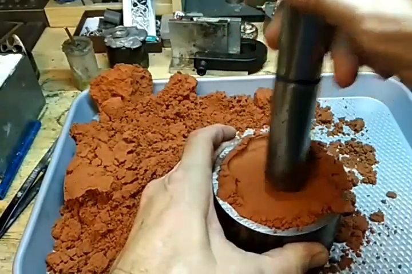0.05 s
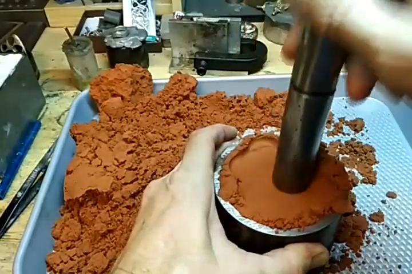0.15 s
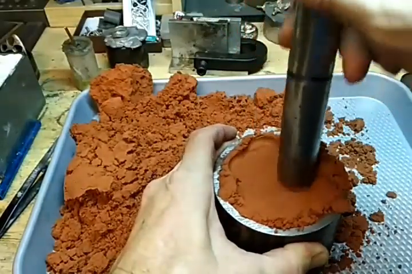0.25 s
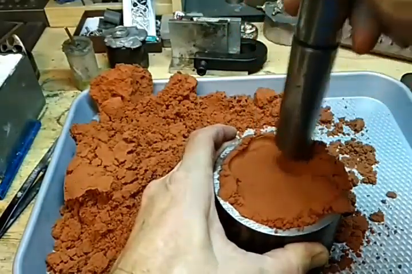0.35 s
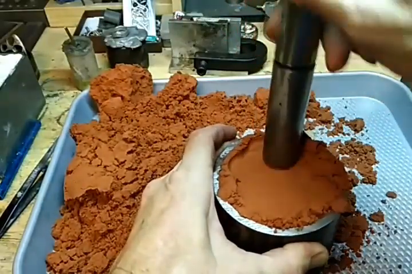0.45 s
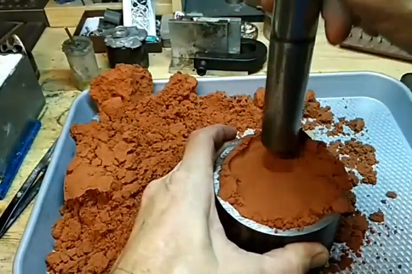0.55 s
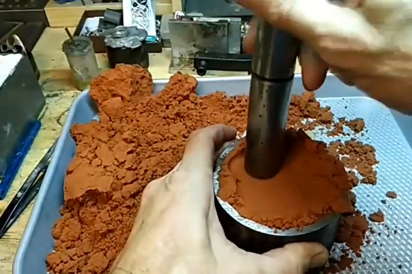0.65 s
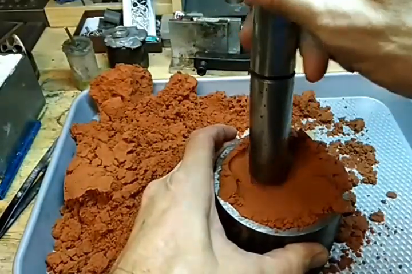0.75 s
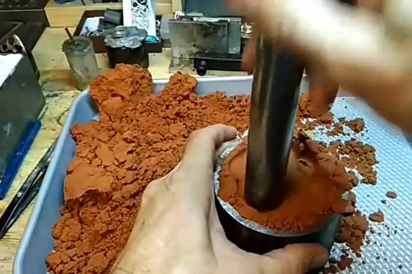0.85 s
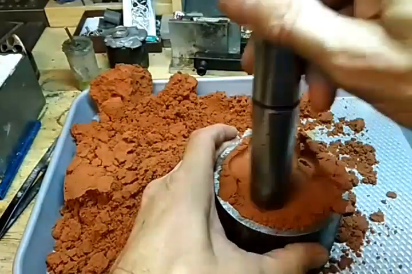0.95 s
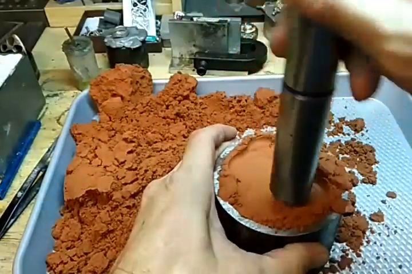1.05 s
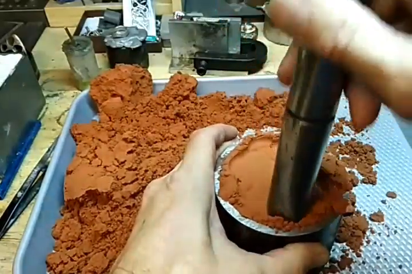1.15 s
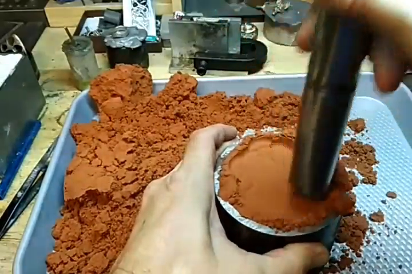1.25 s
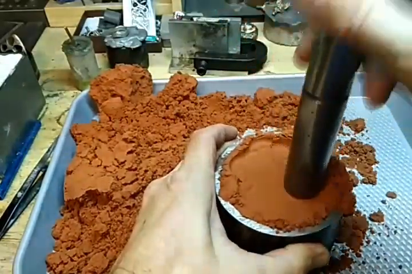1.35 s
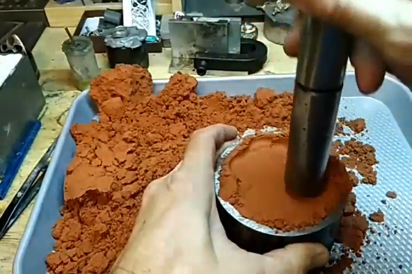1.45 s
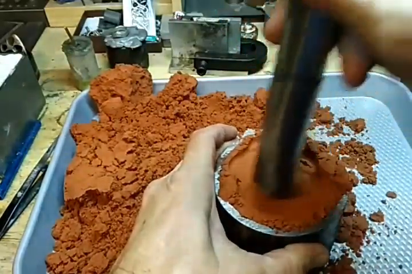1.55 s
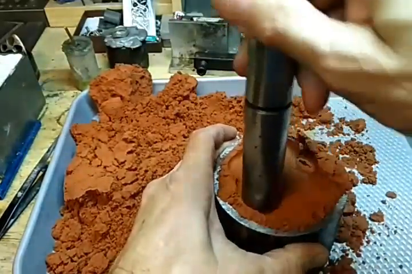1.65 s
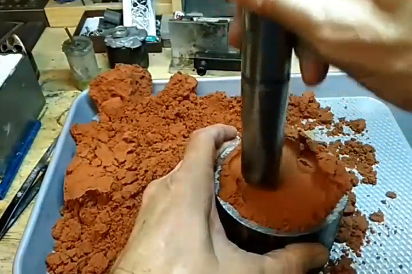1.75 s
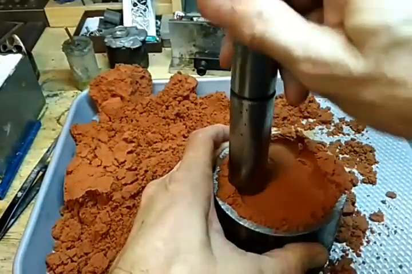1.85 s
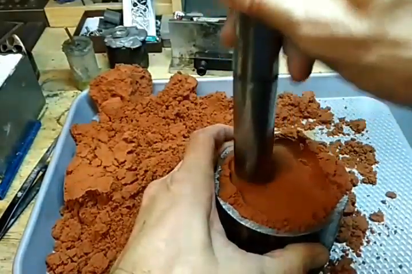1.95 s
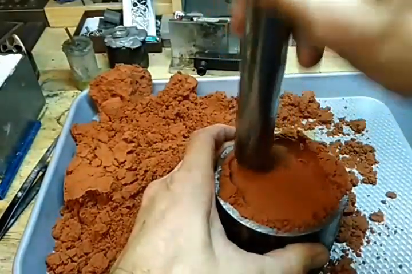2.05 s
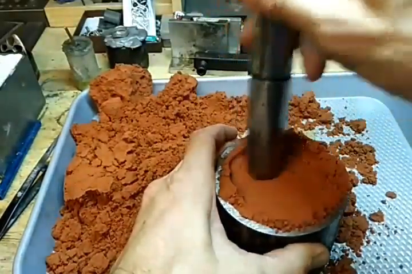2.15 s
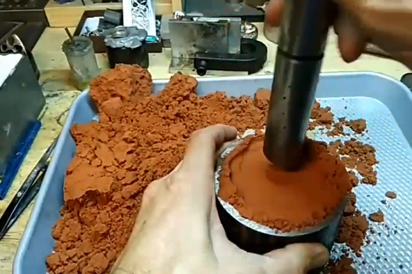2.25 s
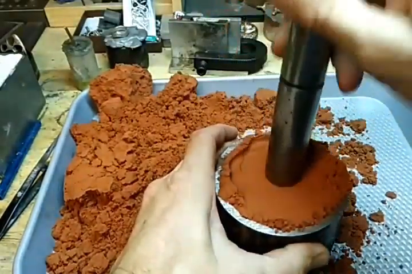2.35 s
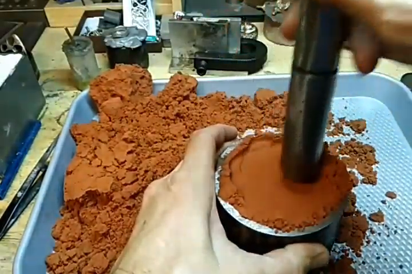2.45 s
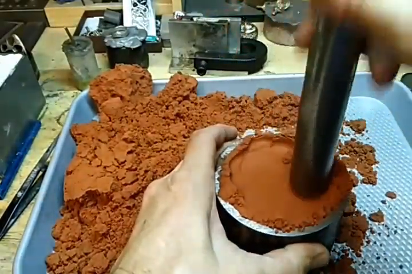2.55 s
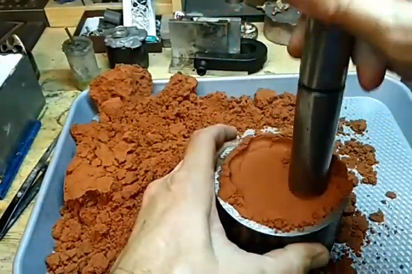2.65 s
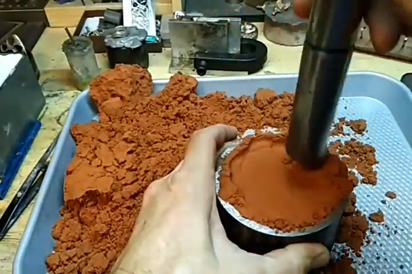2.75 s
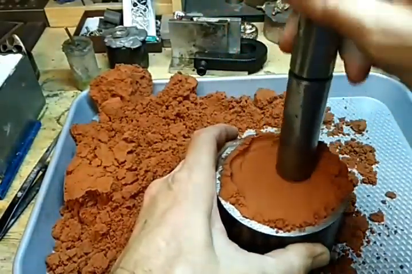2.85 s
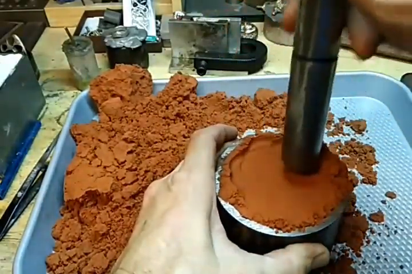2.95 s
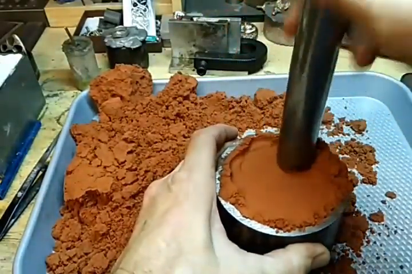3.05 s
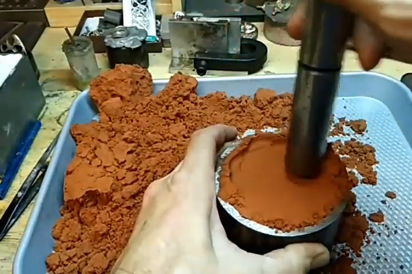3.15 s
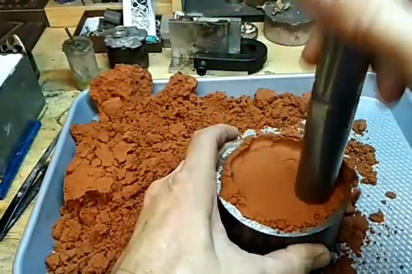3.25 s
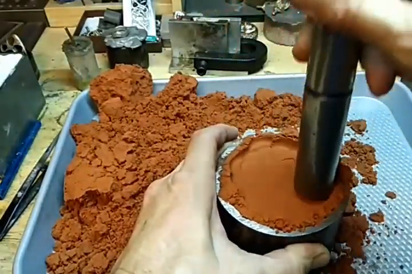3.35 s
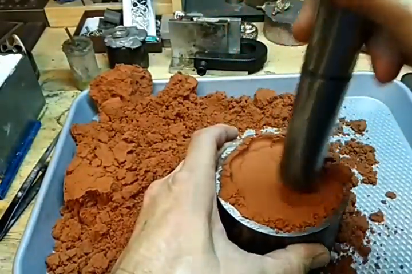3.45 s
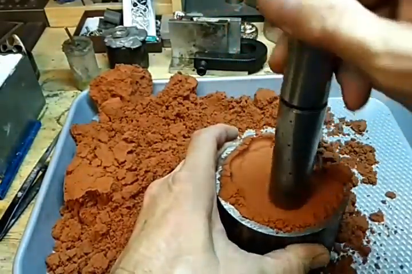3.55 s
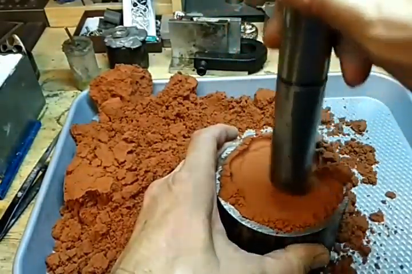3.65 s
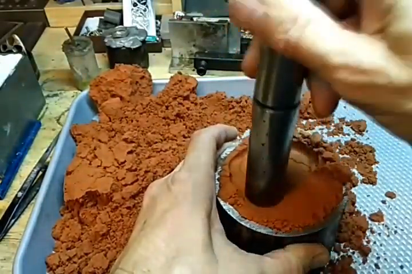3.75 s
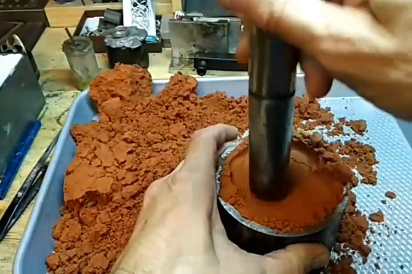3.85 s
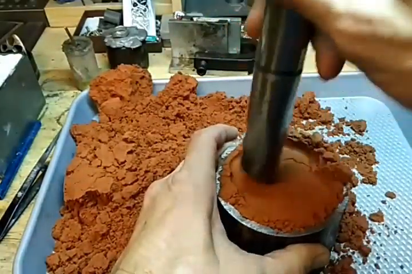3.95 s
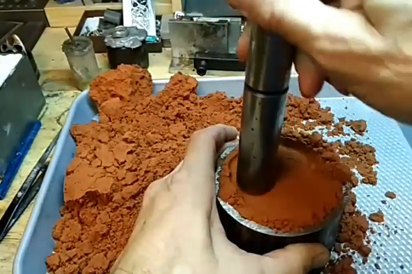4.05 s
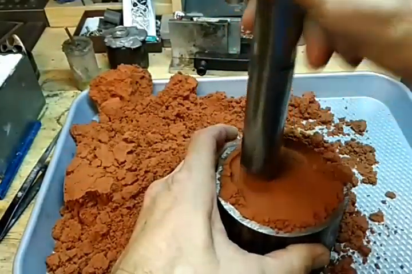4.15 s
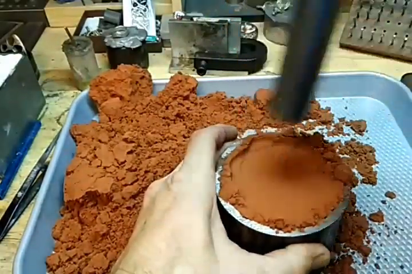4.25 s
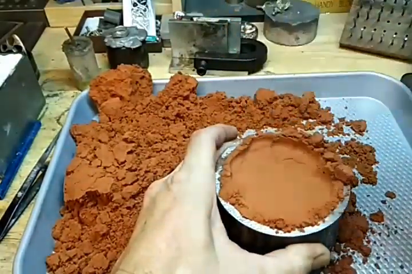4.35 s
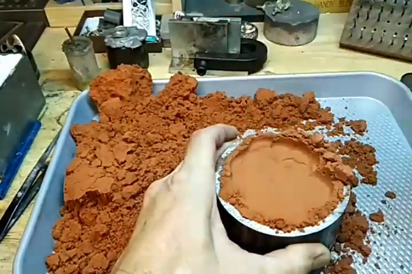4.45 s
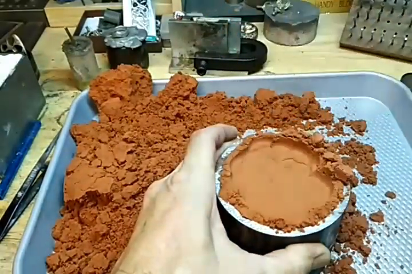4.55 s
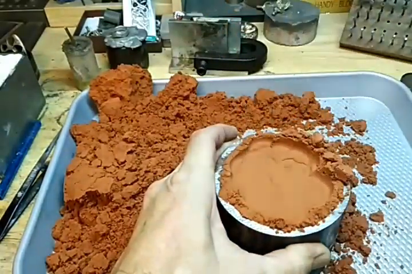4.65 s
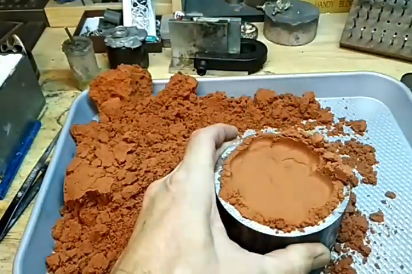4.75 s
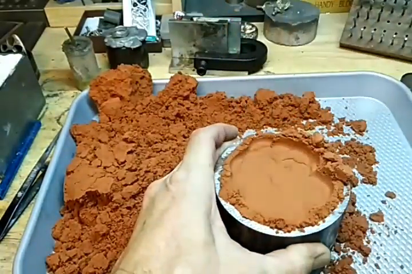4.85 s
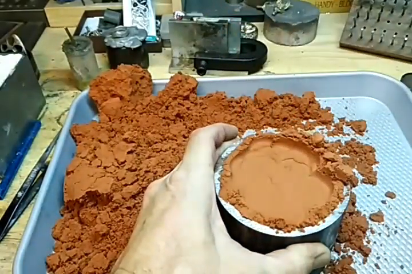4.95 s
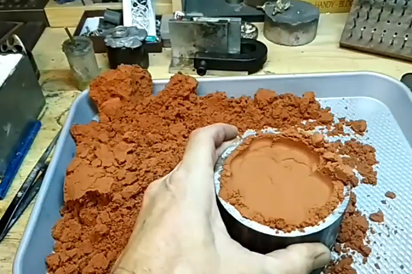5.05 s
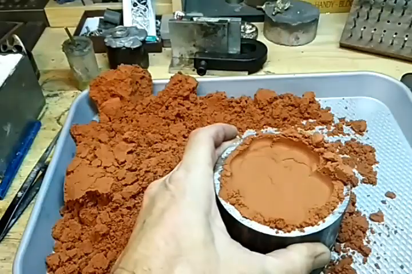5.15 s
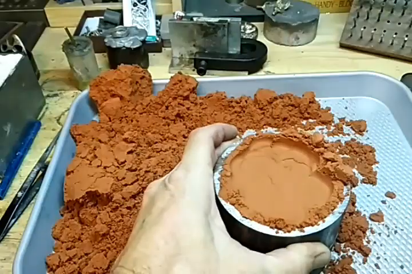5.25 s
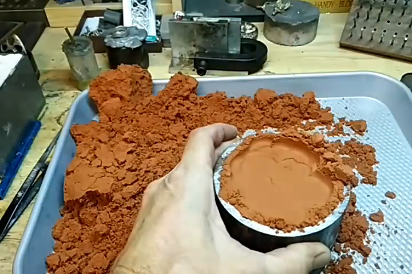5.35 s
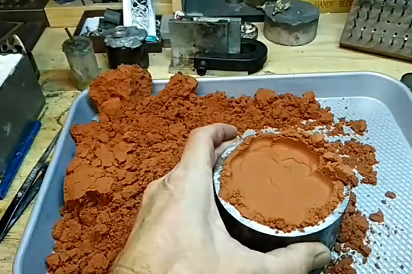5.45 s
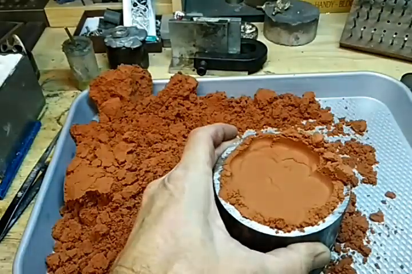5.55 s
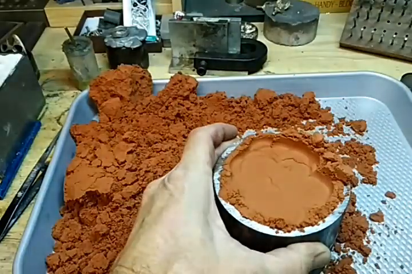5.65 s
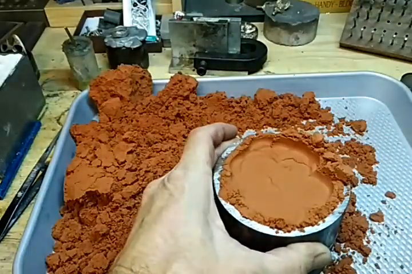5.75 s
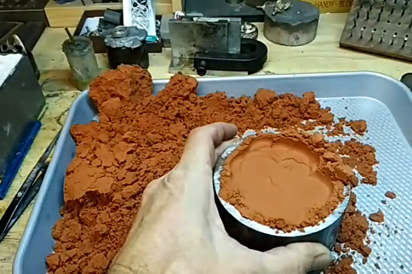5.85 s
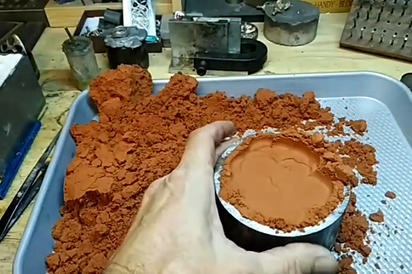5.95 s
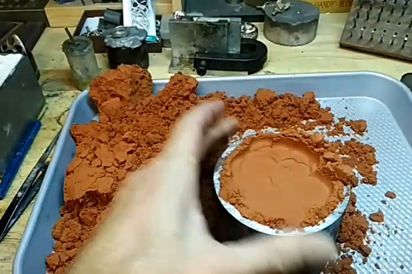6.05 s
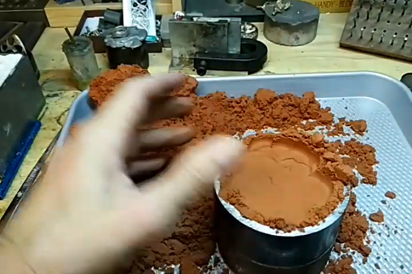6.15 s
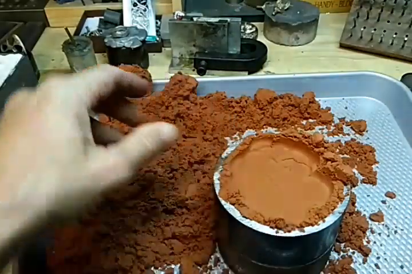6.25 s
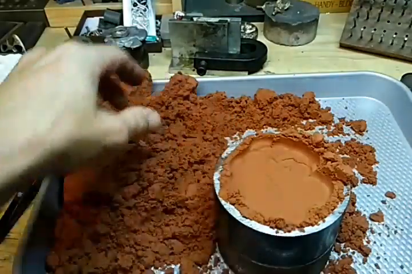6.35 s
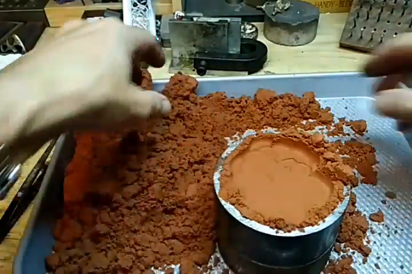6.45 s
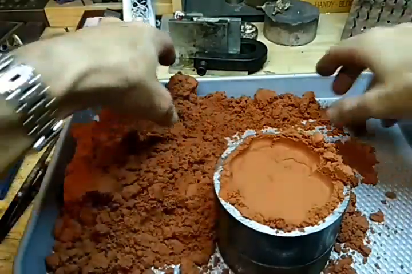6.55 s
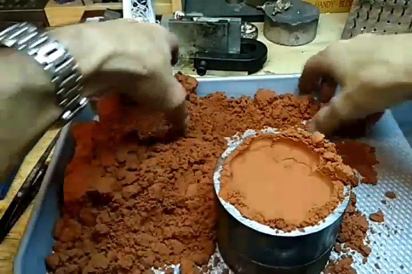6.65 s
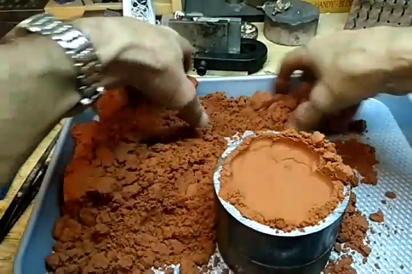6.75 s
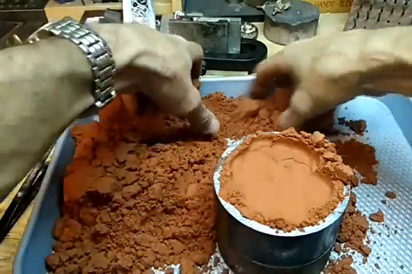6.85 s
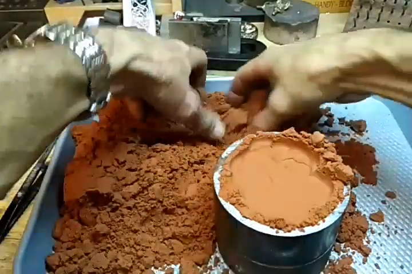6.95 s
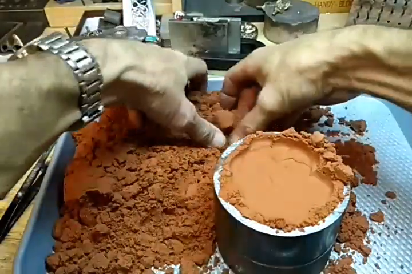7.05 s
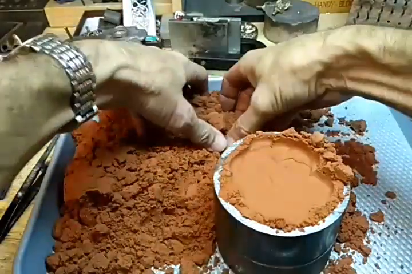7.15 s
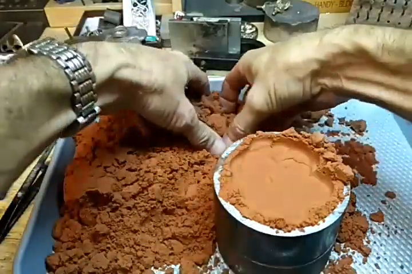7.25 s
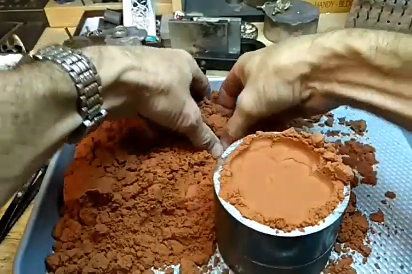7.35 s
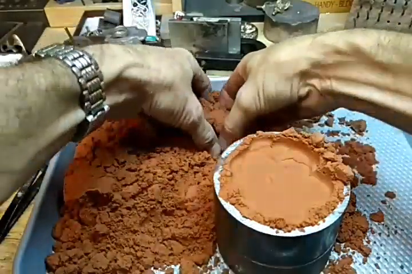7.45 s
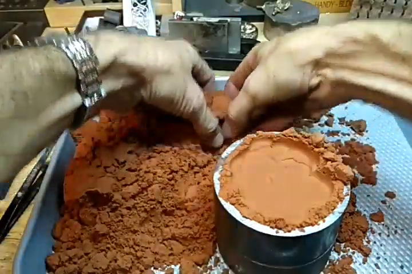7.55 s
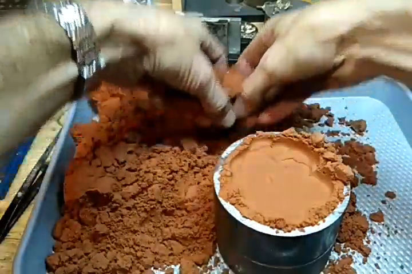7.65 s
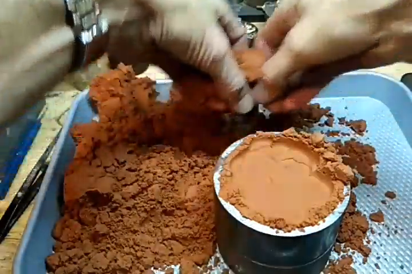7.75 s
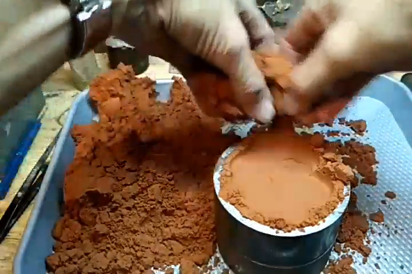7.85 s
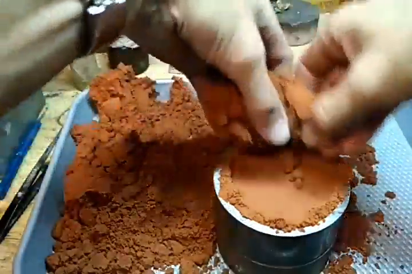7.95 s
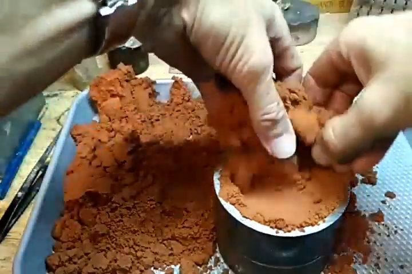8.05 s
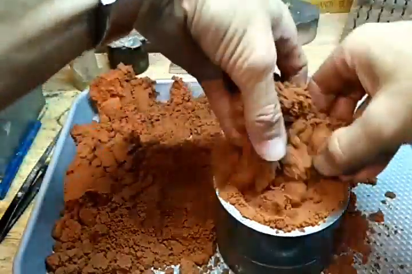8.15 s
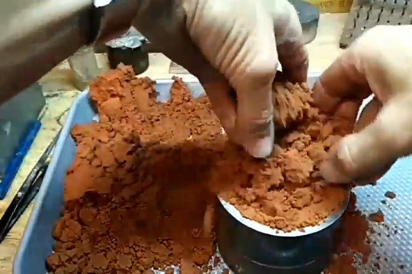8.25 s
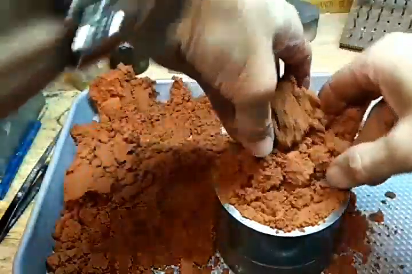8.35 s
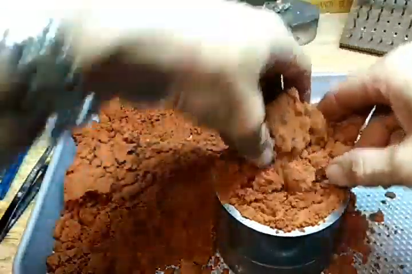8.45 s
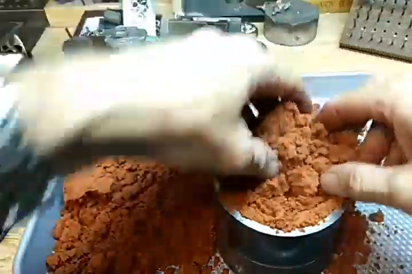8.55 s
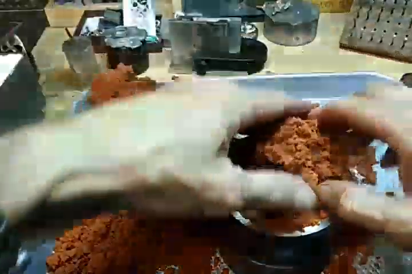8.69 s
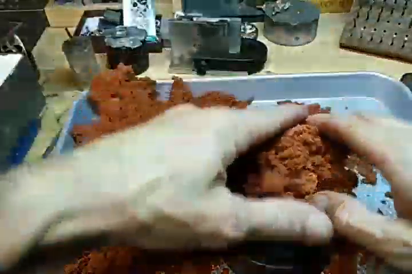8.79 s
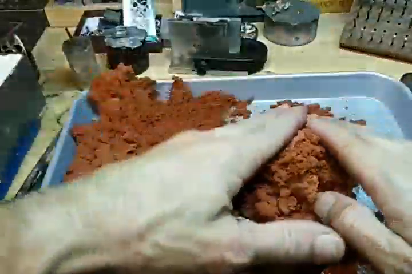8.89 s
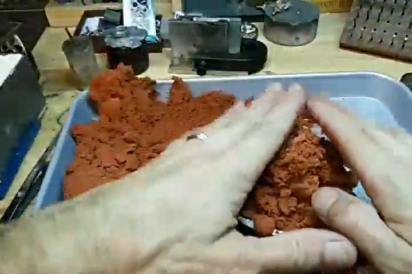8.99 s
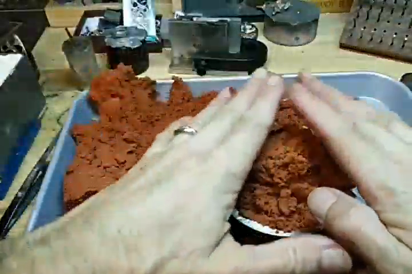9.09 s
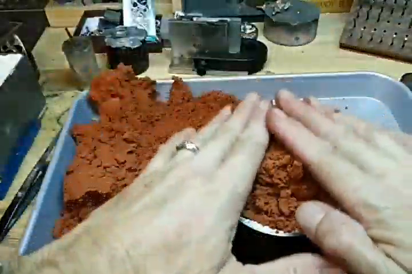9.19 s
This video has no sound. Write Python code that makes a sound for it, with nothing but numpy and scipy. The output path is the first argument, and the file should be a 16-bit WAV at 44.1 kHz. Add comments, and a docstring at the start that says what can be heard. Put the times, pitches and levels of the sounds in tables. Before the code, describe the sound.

Fast, gritty thuds of sand being pounded in a metal mould, then a few knocks on a wooden bench and quiet scooping.

```python
"""Crunching thumps, about four a second, as a steel rod rams damp sand into a metal flask.
Each blow makes the grains slip, excites the modes of the flask, its plastic tray and the workbench,
and leaves the rod ringing faintly in a small workshop. The rod is laid down with a few knocks,
then fingers rustle through loose sand in the tray. A soft mains hum lies underneath."""
import sys
import numpy as np
from scipy import signal
from scipy.fft import rfft, irfft
from scipy.io import wavfile
from scipy.ndimage import uniform_filter1d

SR = 44100
rng = np.random.default_rng(int(sys.argv[2]) if len(sys.argv) > 2 else 0)


def wav_out(sig):
    """Save sig, one row per channel (or a flat mono array), as 16-bit PCM at SR to the path in sys.argv[1]."""
    wavfile.write(sys.argv[1], SR, np.round(np.clip(np.atleast_2d(sig).T, -1, 1) * 32767).astype(np.int16))


N = 406602
AGE = np.arange(int(.6 * SR)) / SR  # seconds since an event began
BLOW_S = .065
BOOM_GROWTH = .55  # dB of bench boom per dB of excitation

# rod blows: start_s, force_db (against a usual blow), squeeze_db (against the bite), ring_db
BLOWS = [(0.0107, -0.6, -11, -49.5), (0.2555, -4, -16, -51.5), (0.506, -17.5, -23.5, -76),
         (0.7416, 6, -19, -38), (0.96, -5, -14.5, -54), (1.213, -7.7, -14.5, -65),
         (1.4531, -1, -9.5, -48.5), (1.694, 3, -13.5, -49), (1.9308, -6, -13, -60), (2.1715, 5.5, -16, -40),
         (2.4182, 1, -12, -42.5), (2.666, -0.5, -6.5, -55), (2.9229, -2.5, -13, -50),
         (3.161, -9.5, -20, -79), (3.387, -17.5, -21.5, -84), (3.6272, -1.5, -8, -62),
         (3.8705, -0.1, -9, -48), (4.1229, 2, -17.5, -46)]
# modes of the workbench and of the plastic tray: pitch_hz, level_db, t60_s
BENCH_MODES = [(54, -12, .25), (82, -16, .11), (105, 0, .14)]
TRAY_MODES = [(152, -27.5, 0.034), (164.6, -17.5, 0.17), (217.6, -0.5, 0.06), (287.4, -8.5, 0.089),
              (404, -25, 0.11), (445.1, -19.5, .14), (580, -18.5, 0.082), (655, -25, 0.12),
              (830, -20, 0.12), (949, -20.5, 0.098), (1197, -17.5, 0.047)]
# spectra of a knock on the tray and of a sharp tick: frequency_hz, gain_db
KNOCK_SPECTRUM = [(200, -28.5), (350, 0.5), (440, 0), (600, -5.5), (730, -6), (840, -3), (980, -1.5),
                  (1100, -3.5), (1230, -2), (1450, -10.5), (1900, -14), (3000, -24), (8000, -79.5)]
TICK_SPECTRUM = [(500, -19), (1500, 6), (2500, 1), (4500, -1.5), (8000, -4.5), (11000, -13), (15500, -26.5)]


def ramming():
    """Granular friction and impact: the rod bites and squeezes sand, driving flask, tray and bench."""
    # spectrum of slipping sand: frequency_hz, gain_db
    crunch_spectrum = [(400, -23), (1200, -2.5), (2000, -4), (3200, 0.5), (4500, -2), (6300, -4),
                       (8200, -1), (10000, -7.5), (12000, -13.5), (15500, -16.5)]
    # modes of the flask wall: pitch_hz, level_db, t60_s
    flask_modes = [(1792, -2, .09), (2037, -3, .09), (2637, -2, .14), (3280, 0, .12), (4165, -1, .12),
                   (5049, -1, .15), (5276, -1, .12), (6298, -7, .14), (7490, -2, .16), (7994, -3, .15),
                   (9106, -2, .12)]
    bounce_hz = 226.8  # the rod and heavy flask bouncing on the springy sand bed
    sand, body = np.zeros((2, 2, N))
    for s, force_db, squeeze_db, _ in BLOWS:
        # hard blows bounce the flask; soft ones are mostly crunch and boom
        crunch_db, boom_db = -32.8 + .83 * force_db, -34.5 + BOOM_GROWTH * force_db
        knock_db, thump_db = -29 + 1.05 * force_db, -31 + .92 * force_db
        bounce_db = -29.5 + 1.5 * force_db
        # a faint, brief hiss leads into each blow
        lead_in = swell(peak_s=.004, sharpness=2.2)
        add(sand, s - .004, sized(grains(lead_in, crunch_spectrum, spread_db=.5), crunch_db - 21))
        bite = burst(rise_s=.0016, fall_s=.0036)
        squeeze = amp(squeeze_db) * swell(peak_s=.022, sharpness=2.4)
        add(sand, s, sized(grains(bite + squeeze, crunch_spectrum, spread_db=2.5), crunch_db))
        push = burst(rise_s=.0005, fall_s=.007)
        push += amp(squeeze_db + 5.5) * swell(peak_s=.014, sharpness=1.5)
        add(sand, s, sized(grains(push, KNOCK_SPECTRUM, spread_db=.5), knock_db))
        bounce = swell(peak_s=.014, sharpness=3.2) * np.sin(2 * np.pi * bounce_hz * AGE)
        add(body, s + .00042, sized(bounce, bounce_db))
        add(body, s + .00088, ring(TRAY_MODES, thump_db, rise_s=.012))
        add(body, s, ring(BENCH_MODES, boom_db, rise_s=.006))
        add(body, s, chime(flask_modes, crunch_db - 13.5))
    return body + early_reflections(sand, level_db=-14.5)


def rod_ringing():
    """Free vibration: the lifted rod rings until the sand damps it at the next blow."""
    # modes of the rod and of its thin high ping: pitch_hz, level_db, t60_s
    rod_modes = [(1495, -25, .65), (2013, -25, .45), (2711, 0, .42), (3085, -21, .5), (5050, -22, .4),
                 (6298, -20, .33), (6954, -4, .22), (7994, -23, .5), (11490, -28, .7), (12520, -21, .45),
                 (14790, -19, .42)]
    ping_modes = [(10330, 0, .85)]
    # the blow that excites the ping: start_s, level_db
    pings = [(2.4182, -49)]
    strikes = [(s, db, rod_modes) for s, _, _, db in BLOWS] + [(s, db, ping_modes) for s, db in pings]
    out = np.zeros((2, N))
    for s, db, modes in strikes:
        next_s = min([row[0] for row in BLOWS if row[0] > s + BLOW_S], default=N / SR)
        damping = np.exp(-np.maximum(s + AGE - next_s, 0) / .0089)
        add(out, s, damping * chime(modes, db))
    return out


def rocking():
    """Impact: tilted by an off-centre blow, the flask drops back and excites the tray's modes."""
    # landings: start_s, knock_db, thump_db
    landings = [(0.983, -41, -49), (1.936, -29, -38), (3.179, -44.5, -63), (3.205, -47.5, -49.5),
                (3.433, -57.5, -48.5)]
    out = np.zeros((2, N))
    for s, knock_db, thump_db in landings:
        add(out, s, hit(KNOCK_SPECTRUM, knock_db, rise_s=.00073, fall_s=.0085, spread_db=-2))
        add(out, s, ring(TRAY_MODES, thump_db, rise_s=.015))
    return out


def rim_clacks():
    """Damped resonance: the rod strikes the flask's rim, giving a brief narrow band of noise."""
    # contacts: start_s, level_db, pitch_hz
    contacts = [(0.505, -52.5, 2340), (1.2123, -48, 2100), (3.3845, -45.5, 2000), (4.1231, -39, 2450)]
    out = np.zeros((2, N))
    for s, db, hz in contacts:
        resonance = [(hz / 2, -35), (hz * .88, -13), (hz, 0), (hz * 1.14, -13), (hz * 2, -35)]
        add(out, s, hit(resonance, db, rise_s=.0008, fall_s=.007, spread_db=1.5))
    return out


def laying_down():
    """Repeated impact: the rod clinks on a tool, tips onto the wooden bench and settles."""
    # contacts: start_s, board_db, knock_db, tick_db
    contacts = [(5.506, -51, -54.5, -57), (5.546, -48.5, -55.5, -64), (5.609, -38.5, -44, -50.5),
                (5.649, -42, -42, -51.5), (5.784, -30.5, -40.5, -59), (5.805, -40, -44, -67)]
    # modes of the bench top, of steel striking wood and of the tool: pitch_hz, level_db, t60_s
    board_modes = [(122, 5.5, 0.075), (170, -8, 0.25), (217.7, 2, 0.23), (293, -3, 0.18), (436, -24, 0.14),
                   (454.4, -11.5, 0.28), (562, -17, 0.16), (705, -16, 0.078), (825, -24, 0.14)]
    clack_modes = [(1315, 3, 0.052), (1567, 4, 0.046), (1933, 9, 0.047), (2100, -19, 0.07), (2450, -5, .07),
                   (2810, -5, 0.12)]
    tool_modes = [(4750, 0, .35), (7580, -5, .45)]
    # spectrum of a knock on wood: frequency_hz, gain_db
    wood_spectrum = [(150, -16), (290, 3), (400, 4), (480, 1), (600, -4), (780, -2), (1000, -7.5),
                     (1300, -12.5), (2000, -19.5), (2800, -23), (4000, -28), (9000, -40)]
    out = np.zeros((2, N))
    for s, board_db, knock_db, tick_db in contacts:
        add(out, s, hit(TICK_SPECTRUM, tick_db, rise_s=.00035, fall_s=.018, spread_db=1.5))
        add(out, s, chime(clack_modes, tick_db - .6))
        add(out, s, hit(wood_spectrum, knock_db, rise_s=.00061, fall_s=.022, spread_db=4.5))
        add(out, s, ring(board_modes, board_db, rise_s=.0045))
        add(out, s, ring(BENCH_MODES, BOOM_GROWTH * board_db - 29.5, rise_s=.0026))
    add(out, contacts[0][0], chime(tool_modes, -62.5))
    return early_reflections(out, level_db=-21)


def scooping():
    """Stick-slip friction: fingers rub the embossed tray while loose sand crumbles through them."""
    # finger strokes: start_s, length_s, rustle_db, rub_db
    strokes = [(6.755, 0.21, -58.5, -69.5), (6.959, .11, -59, -58.5), (7.103, 0.043, -57.5, -51.5),
               (7.222, 0.099, -62, -61.5), (7.398, .055, -59, -57), (7.649, 0.019, -82, -65.5)]
    # clods break off and drag on the tray: start_s, drag_db, snap_db
    clods = [(7.123, -56, -64), (7.134, -66, -62), (7.152, -63, -70), (7.203, -79, -62), (7.422, -61, -78),
             (7.451, -61, -70)]
    # fingertips nudge the tray: start_s, level_db
    nudges = [(6.757, -67), (6.985, -64), (7.057, -65.5)]
    # spectra of loose sand and of the rubbed tray: frequency_hz, gain_db
    rustle_spectrum = [(100, -2), (280, 8), (550, -0.5), (1500, 0.5), (3000, 1), (5000, -0.5), (8500, 1),
                       (12000, -3), (15500, -6.5)]
    rub_spectrum = [(200, -15), (600, -14), (850, 4.5), (980, 6.5), (1200, -8.5), (2000, -8.5), (2400, -26),
                    (3000, -21), (4500, -22), (9000, -42)]
    out = np.zeros((2, N))
    for s, length_s, rustle_db, rub_db in strokes:
        settling = np.exp(-np.maximum(AGE - length_s, 0) / .039)
        stroke = onset(rise_s=.0059) * settling
        slow_noise = unit_rms(uniform_filter1d(rng.standard_normal(len(AGE)), size=350))
        slips = amp(1.6 * slow_noise)
        add(out, s, amp(rustle_db) * stroke * unit_rms(grains(slips, rustle_spectrum, spread_db=1.5)))
        add(out, s, amp(rub_db) * stroke * unit_rms(grains(slips, rub_spectrum, spread_db=6.5)))
    for s, drag_db, snap_db in clods:
        add(out, s, hit(rub_spectrum, drag_db, rise_s=.00098, fall_s=.0081, spread_db=10))
        add(out, s, hit(TICK_SPECTRUM, snap_db, rise_s=.00055, fall_s=.0082, spread_db=2))
    for s, db in nudges:
        add(out, s, ring(TRAY_MODES, db, rise_s=.003))
    return early_reflections(out, level_db=-3.5)


def handling():
    """Light impact and fracture: metal clinks, a hand bumps the bench and crumbs snap."""
    # events of each kind: start_s, level_db
    clinks = [(0.9252, -55.5), (2.315, -55.5), (2.5130, -61.5)]
    bumps = [(4.944, -55.5), (5.021, -62)]
    crumbs = [(4.635, -76), (4.789, -68), (5.27, -79.5), (6.756, -60.5), (7.057, -76), (7.532, -69)]
    # modes of clinking metal: pitch_hz, level_db, t60_s
    clink_modes = [(3290, -4, .09), (3365, 0, .11), (3440, -6, .08), (4350, -11, .08), (5750, -11, .08),
                   (6045, -6, .15), (7278, -12, .13), (8400, -11, .06)]
    # spectrum of a dull bump through the bench top: frequency_hz, gain_db
    bump_spectrum = [(30, -18), (55, 5), (85, -3), (130, -14), (300, -30), (900, -32), (4000, -75)]
    out = np.zeros((2, N))
    for s, db in clinks:
        add(out, s, chime(clink_modes, db))
        add(out, s, hit(TICK_SPECTRUM, db - 4.5, rise_s=.0011, fall_s=.0095, spread_db=-8))
    for s, db in bumps:
        add(out, s, hit(bump_spectrum, db, rise_s=.006, fall_s=.018, spread_db=-1.5))
    for s, db in crumbs:
        add(out, s, hit(TICK_SPECTRUM, db, rise_s=.00031, fall_s=.011, spread_db=1.5))
    return out


def early_reflections(x, level_db):
    """Comb filtering: echoes off tray walls and tools arrive within 10 ms and colour the mids."""
    count = 8
    taps = np.zeros((2, SR // 100))
    for port in taps:
        delays = rng.integers(SR // 2000, len(port), count)
        port[delays] = rng.choice([-1, 1], count) / np.sqrt(count)
    echoes = signal.oaconvolve(x, taps, axes=1)[:, :N]
    band = signal.butter(2, [1100, 6000], "band", fs=SR, output="sos")
    return x + amp(level_db) * signal.sosfilt(band, echoes)


def workshop(x):
    """Reverberation: diffuse reflections decay exponentially, each band at its own rate."""
    # reverberation times: frequency_hz, t60_s
    decay_times = [(100, 0.36), (300, 0.34), (1000, 0.25), (3000, .26), (8000, 0.27), (15000, 0.46)]
    hz, t, bands = signal.stft(paired(rng.standard_normal((2, len(AGE)))), SR, nperseg=256)
    decay = amp(-60 * t / curve_at(decay_times, hz)[:, None])
    _, tail = signal.istft(bands * decay, SR, nperseg=256)
    tail = tail[:, :len(AGE)] * onset(rise_s=.0013)
    return signal.fftconvolve(x, tail / np.linalg.norm(tail[0]), axes=1)[:, :N]


def hum_and_air():
    """Harmonics of a mains appliance waver in phase over the broadband noise of room air."""
    # hum partials: pitch_hz, rms_db
    partials = [(59.6, -69.5), (119.8, -73.5), (239.8, -82), (360, -75), (479.7, -81.5), (720, -88.5),
                (839.6, -85.5), (959, -89.5), (1199, -88)]
    # spectrum of room air: frequency_hz, gain_db
    air_spectrum = [(15, -46), (25, 2), (66, 0.5), (129, -9), (188, -12.5), (240, -14), (297, -18.5),
                    (359, -9.5), (410, -19), (482, -13), (598, -20), (848, -19), (1530, -24), (9050, -25),
                    (15500, -29.5)]
    t = np.arange(N) / SR
    knots = np.linspace(0, t[-1], num=40)
    hum = np.zeros(N)
    for hz, db in partials:
        waver = .31 * np.interp(t, knots, rng.standard_normal(len(knots)))
        hum += np.sqrt(2) * amp(db) * np.sin(2 * np.pi * (hz * t + rng.random()) + waver)
    return hum + amp(-64) * unit_rms(grains(np.ones(N), air_spectrum, spread_db=.5))


def ring(modes, level_db, rise_s):
    """Modal superposition: damped sines of alternating sign, their mix varying with the spot struck."""
    hz, db, t60 = np.transpose(modes)[:, :, None]
    spot_db = 1.2 * rng.standard_normal(db.shape)
    waves = amp(db + spot_db - 60 * AGE / t60) * np.sin(2 * np.pi * hz * AGE)
    signs = (-1) ** np.arange(len(modes))
    return sized(signs @ waves * onset(rise_s), level_db)


def chime(modes, level_db):
    """Modal radiation: each metal mode reaches each microphone port with its own phase and strength."""
    hz, db, t60 = np.transpose(modes)[:, :, None]
    phase = rng.random((2, len(modes), 1)) / 3
    spot_db = 1.5 * rng.standard_normal(phase.shape)
    waves = amp(db + spot_db - 60 * AGE / t60) * np.sin(2 * np.pi * (hz * AGE + phase))
    attack = np.minimum(AGE * SR / 20, 1)
    return sized(waves.sum(1) * attack, level_db)


def hit(spectrum, level_db, rise_s, fall_s, spread_db):
    """Transient excitation: a brief contact gives a burst of filtered noise."""
    return sized(grains(burst(rise_s, fall_s), spectrum, spread_db), level_db)


def grains(envelope, spectrum, spread_db):
    """Granular noise: tiny slips in clumps of uneven strength, filtered by a spectrum."""
    count = len(envelope)
    clumps = amp(spread_db * np.repeat(rng.standard_normal(count // 32 + 1), 32)[:count])
    return colour(paired(rng.standard_normal((2, count)) * clumps * envelope), spectrum)


def paired(x):
    """Spatial coherence: two close microphone ports hear long waves alike."""
    # left-right likeness: frequency_hz, correlation
    coherence = [(60, 0.66), (270, 0.86), (450, .8), (740, 0.2), (1200, .15), (2500, 0.055), (5500, 0)]
    left, right = rfft(x)
    same = curve_at(coherence, np.fft.rfftfreq(x.shape[1], 1 / SR))
    return irfft([left, same * left + np.sqrt(1 - same ** 2) * right], x.shape[1])


def colour(x, spectrum):
    """Minimum-phase filter: the Hilbert transform of the log gain sets the phase."""
    size = 4096
    log_gain = np.log(amp(curve_at(spectrum, abs(np.fft.fftfreq(size, 1 / SR)))))
    response = np.exp(np.conj(signal.hilbert(log_gain)))
    taps = np.fft.ifft(response).real[:size // 2]
    return signal.oaconvolve(x, taps[None], axes=1)[:, :x.shape[1]]


def onset(rise_s):
    """Smooth rise from 0 to 1."""
    return 1 - np.exp(-(AGE / rise_s) ** 2)


def burst(rise_s, fall_s):
    """Smooth rise with exponential decay."""
    return onset(rise_s) * np.exp(-AGE / fall_s)


def swell(peak_s, sharpness):
    """Gamma envelope: grows to 1 and dies away."""
    return (AGE / peak_s * np.exp(1 - AGE / peak_s)) ** sharpness


def amp(db):
    """Decibels to amplitude."""
    return 10 ** (np.asarray(db) / 20)


def curve_at(points, hz):
    """Linear interpolation on a log-frequency axis."""
    frequency, value = np.transpose(points)
    return np.interp(np.log(hz + 1), np.log(frequency), value)


def unit_rms(x):
    """Scales to rms 1."""
    return x / np.sqrt(np.mean(x ** 2) + 1e-20)


def sized(x, db):
    """Equal energy: scales a hit to match a level db held for BLOW_S."""
    return amp(db) * unit_rms(x) * np.sqrt(BLOW_S * SR / x.shape[-1])


def add(mix, start_s, sound):
    """Superposes a sound on the mix."""
    part = mix[:, max(round(start_s * SR), 0):][:, :sound.shape[-1]]
    part += sound[..., :part.shape[1]]


def scene():
    """Direct and reverberant sound reach two ports of unlike response, over hum and air."""
    # imbalance of the microphone ports: frequency_hz, left_minus_right_db
    imbalance = [(50, 3.5), (200, 1), (550, 0), (1100, 1), (2400, -2.5), (4500, -1), (6000, 4),
                 (8200, 14.5), (10000, 14), (12500, 9), (15500, 3)]
    work = ramming() + rod_ringing() + rocking() + rim_clacks()
    work += laying_down() + scooping() + handling()
    work += amp(-12.5) * workshop(work)
    ratio = amp(curve_at(imbalance, np.fft.rfftfreq(N, 1 / SR)))
    port_gains = np.array([ratio, np.ones_like(ratio)]) * np.sqrt(2 / (1 + ratio ** 2))
    return irfft(rfft(work) * port_gains, N) + hum_and_air()


def record(dry):
    """Band limiting: the recorder passes 43 Hz to 15750 Hz."""
    bass_cut = signal.butter(5, 43, "high", fs=SR, output="sos")
    treble_cut = signal.firwin(511, 15750, window=("kaiser", 9), fs=SR)
    return signal.oaconvolve(signal.sosfilt(bass_cut, dry), treble_cut[None], "same")


dry = scene()
out = record(dry)
wav_out(out)
```